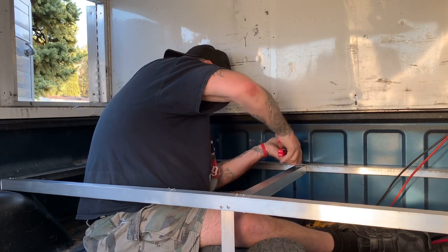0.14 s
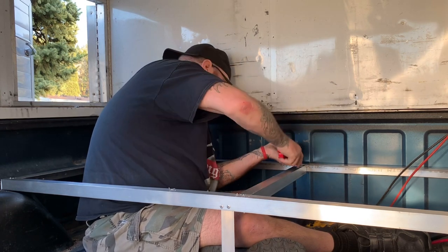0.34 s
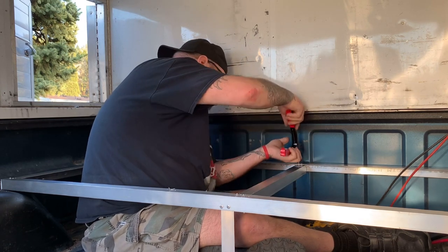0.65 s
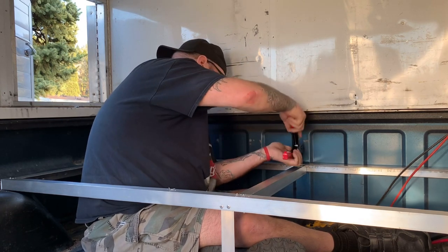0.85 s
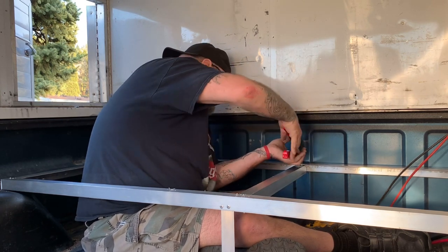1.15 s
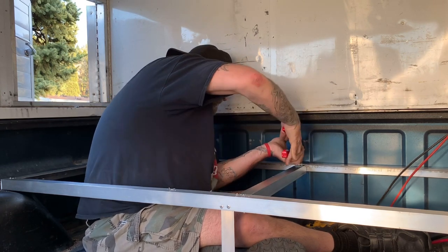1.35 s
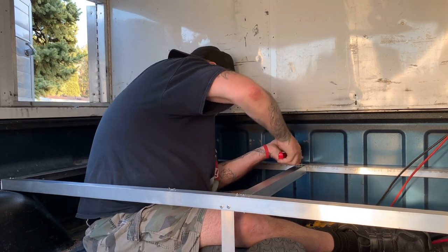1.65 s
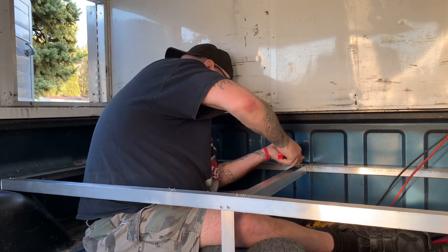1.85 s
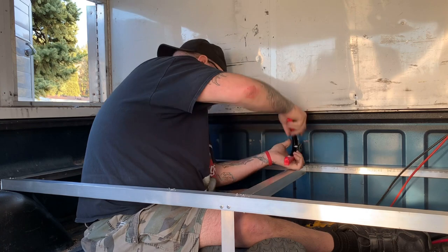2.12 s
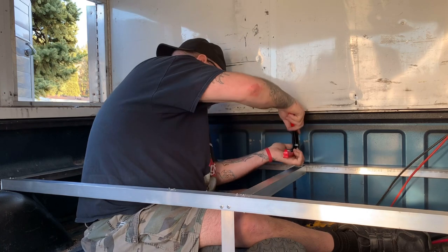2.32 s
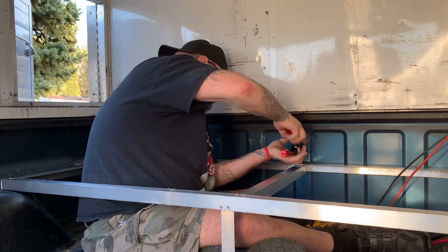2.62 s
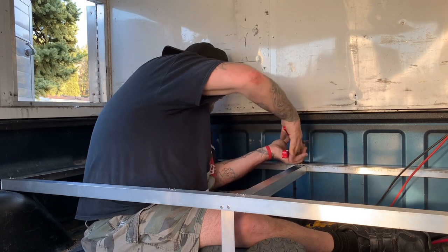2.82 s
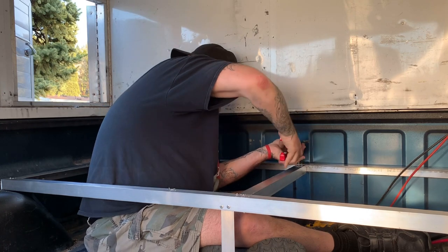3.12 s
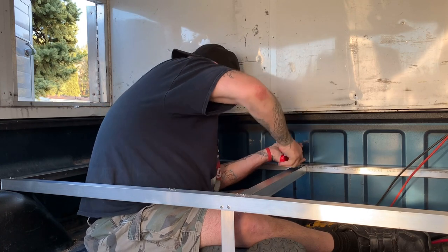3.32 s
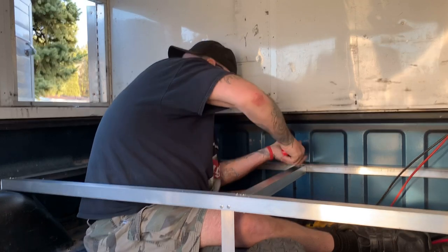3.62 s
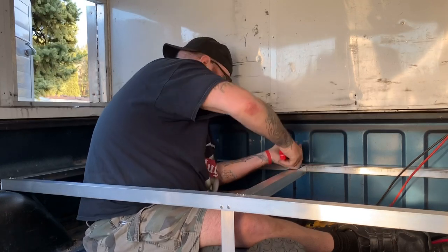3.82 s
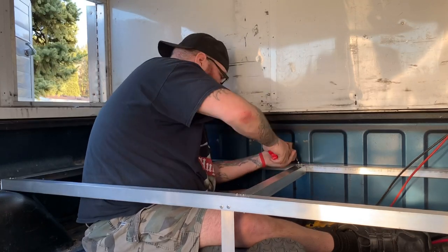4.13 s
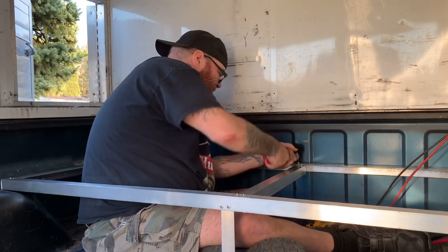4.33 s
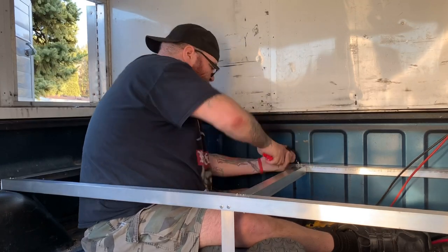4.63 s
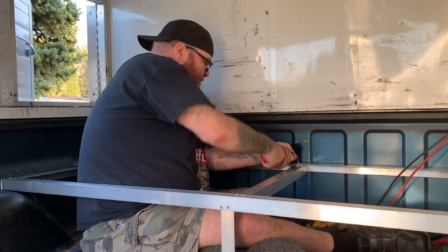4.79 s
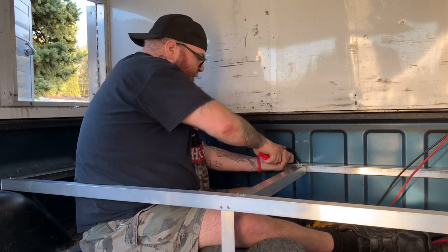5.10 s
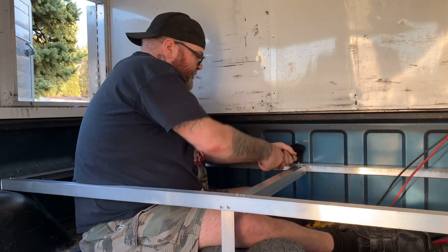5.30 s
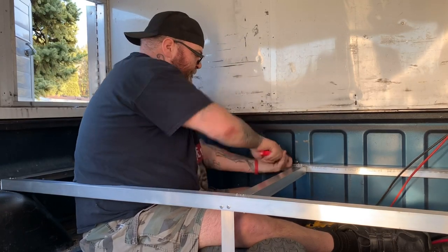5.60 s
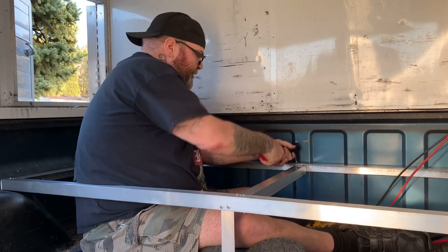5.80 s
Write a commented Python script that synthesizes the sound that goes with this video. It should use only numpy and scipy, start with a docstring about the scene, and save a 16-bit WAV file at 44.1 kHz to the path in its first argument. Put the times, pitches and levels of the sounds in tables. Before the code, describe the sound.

Someone squeezes a hand rivet tool against a hollow metal frame: two moderate knocks early, a loud clattering cluster near two seconds, a tight double snap later, then quieter fiddling and a final bright burst near the end. Underneath are muffled thumps, panel drumming and soft rustling. The space is small, hard and boxy, captured close in stereo, with a faint high ring after hard snaps.

```python
"""Riveting in a sheet-metal cabin

A hand riveter knocks an aluminium tube frame: bursts of tiny impacts excite a crack and damped tube modes,
and panel modes swell after them. Filtered noise gives floor rumble, panel drumming, murmur and the rustle of
hands and cloth; wavering sines give a thin ring after the hardest snaps. Dense random reflections make the
reverberation of the bare cabin, heard through two close microphone ports."""
import sys
import numpy as np
from scipy import signal
from scipy.fft import rfft, irfft, next_fast_len
from scipy.io import wavfile
from scipy.ndimage import uniform_filter1d

SR = 44100
rng = np.random.default_rng(int(sys.argv[2]) if len(sys.argv) > 2 else 0)


def to_wav(sig):
    """Store sig (one row per channel, or 1-D mono) as 16-bit WAV at the path in sys.argv[1].

    Samples outside -1..1 are clipped; the rate is SR.
    """
    pcm = np.clip(np.atleast_2d(sig), -1, 1) * 32767
    pcm = np.round(pcm).astype(np.int16)
    wavfile.write(sys.argv[1], SR, pcm.T)  # frames by channels


N = 262395  # length in samples

# Steady sounds of the shell, rms before sway and weighting:
# [t/s, floor rumble level/dB, panel drumming level/dB, murmur level/dB]
WORK = [(0.0, -47, -40, -50.5), (0.36, -52, -39.5, -53), (0.71, -41.5, -31.5, -41.5),
        (1.04, -41.5, -39, -51.5), (1.37, -45, -38, -51.5), (1.76, -39, -45, -49.5),
        (1.99, -44, -43, -51.5), (2.22, -52.5, -30.5, -42.5), (2.73, -42, -41.5, -51.5),
        (3.2, -42.5, -42.5, -50), (3.56, -60, -38.5, -47.5), (3.84, -56, -39.5, -57), (4.14, -55, -55, -61),
        (4.37, -48.5, -52, -52), (4.54, -47, -45.5, -55.5), (5.55, -53.5, -46.5, -56),
        (5.7, -49.5, -35.5, -43), (5.95, -49.5, -43.5, -56)]
# Spectrum of the floor rumble: [f/Hz, level/dB]
RUMBLE = [(12, -87.5), (27, -26), (40, -7.5), (50, 3), (60, 16), (70, -9), (80, -29), (95, -54.5)]
# Resonances of the drumming panels: [f/Hz, width/Hz, level/dB]
DRUMMING = [(108, 69, -4), (149.7, 14, 2.5), (190, 69, -17.5), (232, 65, -14.5), (354.7, 18, -16.5),
            (430, 56, -18.5), (683, 37, -16.5)]
# Spectrum of the murmur: [f/Hz, level/dB]
MURMUR = [(250, -3), (355, 4.5), (420, -1), (700, -3), (930, -4), (1300, -12), (2500, -27.5), (5000, -65)]
# Spectrum of cloth and fingers: [f/Hz, level/dB]
RUSTLE = [(600, -35.5), (1500, 5.5), (3200, 5.5), (5000, -3), (7500, -11.5), (10500, -14), (13000, -15),
          (16500, -42.5)]
# Rubs of cloth and fingers: [loudest moment t/s, level/dB, length/s]
RUBS = [(0.133, -64, 0.31), (0.49, -46, 0.11), (0.633, -40, .03), (0.687, -45, 0.1), (1.315, -57, 0.12),
        (1.558, -64, 0.37), (1.707, -60, 0.1), (2.02, -52, 0.15), (2.079, -30.5, 0.082), (2.48, -52, .25),
        (2.607, -55.5, 0.11), (3.31, -53, 0.17), (3.448, -41.5, 0.1), (3.813, -79, 0.051),
        (3.972, -72, 0.093), (4.412, -58.5, 0.27), (4.925, -62.5, 0.34), (5.3, -64, 0.18),
        (5.53, -48, 0.047), (5.67, -33.5, 0.14)]
RUSTLE_REST_DB, RUB_DROP_DB = -68, 12.5  # level between rubs; drop half a length from the loudest moment

# Knocks of tool on frame, peak levels before the cabin:
# [t/s, blow level/dB, brightest pitch f/Hz, treble level/dB, panel boom level/dB, boom pitch f/Hz]
KNOCKS = [(0.0934, -47.5, 1546, 17, -41.5, 136), (0.204, -41.5, 1610, -7, -32, 157),
          (0.2488, -49, 2140, 0, -41, 155), (0.3364, -40, 2350, 0, -63, 246),
          (0.425, -38.5, 2020, -10, -62, 147), (0.443, -31, 2330, -4, -39, 180),
          (0.507, -22, 1660, -11, -19, 207), (0.6379, -16.5, 1450, -3, -9, 316),
          (0.7985, -47, 2530, 7, -33.5, 155), (0.8832, -39.5, 2100, -30, -29, 158),
          (0.9053, -35, 2160, -16, -34.5, 171), (0.9857, -39, 2200, -8, -52, 147),
          (1.0935, -55, 1650, -32, -25, 164), (1.2514, -42.5, 2460, 6, -56.5, 154),
          (1.3096, -55, 2470, -7, -59, 145), (1.3875, -49.5, 2900, 2, -45.5, 179),
          (1.65, -45.5, 1530, 6, -40, 126), (1.7302, -52.5, 1550, 0, -49.5, 183),
          (1.955, -40, 1730, -14, -33, 129), (2.0407, -10.5, 2680, 4.5, -23.5, 440),
          (2.0648, -17.5, 6360, -1, -19.5, 360), (2.1479, -10.5, 2000, -0.5, -13.5, 384),
          (2.44, -47, 3270, -27, -31.5, 217), (2.547, -37, 1910, -10, -57, 131),
          (2.796, -41.5, 1570, -18.5, -41, 150), (3.2709, -39.5, 1530, 1, -41.5, 144),
          (3.3758, -7.5, 3730, 2.5, -27.5, 584), (3.3905, -9, 3800, 7, -22.5, 393),
          (3.9392, -56, 3210, 14, -63, 130), (4.0887, -52, 1570, -5, -47, 150.3),
          (4.1727, -53.5, 1750, 0, -65, 191), (4.289, -46.5, 1620, -5.5, -45.5, 129),
          (4.3295, -48.5, 1650, 7, -37, 167), (4.4614, -52, 3340, 19, -48.5, 211),
          (4.564, -44.5, 1780, -13, -37, 145.7), (4.7594, -38.5, 2430, 3.5, -52, 146.5),
          (4.846, -49.5, 1730, -27, -38, 367), (5, -42, 2170, -13, -36, 149),
          (5.022, -36.5, 1780, -13, -33.5, 186), (5.2259, -38, 1670, -16, -62, 160.5),
          (5.25, -38.5, 2140, 0, -39, 146), (5.324, -44, 1660, -4, -32, 129),
          (5.501, -39, 1570, -8, -38.5, 438), (5.5627, -13.5, 3320, 17, -25, 180),
          (5.5868, -6, 2470, 7.5, -23.5, 160), (5.5998, -17, 1920, -28, -13.5, 504),
          (5.681, -9.5, 3840, 8.5, -23.5, 268)]
# Modes of the tube frame: [f/Hz, level/dB, t60/s]
TUBES = [(981, -10, 0.056), (1167, -8, 0.021), (1560, -6.5, .035), (1700, -5, 0.033), (2104, -5.5, 0.025),
         (2164, -8.5, 0.034), (2570, 1, 0.014), (2750, -6, 0.027), (3190, -10, 0.063), (3130, -17, 0.038),
         (3733, 2, 0.0088), (3827, 0.5, 0.013), (4050, -27.5, .03), (4390, -16.5, .025),
         (6306, -14.5, 0.014), (7400, -30, 0.0074), (10600, -13.5, 0.013)]
# Modes of the sheet-metal panels, about which each knock varies: [f/Hz, level/dB, t60/s]
PANELS = [(152.5, -12.5, 0.13), (205, -12, 0.13), (270.4, -8.5, 0.083), (361.3, -5, 0.12),
          (444, -11.5, 0.097), (524.6, -1, 0.065), (644, -9.5, 0.096), (718, -10, 0.099)]
# Spectrum of the crack: [f/Hz, level/dB]
CRACK = [(150, -23.5), (500, -4), (1000, 3.5), (1800, -6.5), (3500, 2.5), (6000, -6), (9000, -7.5),
         (12000, -11.5), (16500, -28)]
RATTLE_S = .0065  # time constant of the impacts of one knock
CRACK_DB, BRIGHT_OCTAVES = 8.5, 0.5  # crack peak over ring peak; 1/e half-width of the hump
BOOM_RISE_S = 0.019  # swell time of the panels

# Decay of the cabin's reflections: [f/Hz, t60/s]
CABIN = [(150, 0.48), (400, 0.19), (1040, 0.23), (2760, 0.16), (7280, 0.12), (14000, 0.1)]
CABIN_DB = 2

# Thin rings after the hardest snaps: [loudest moment t/s, level/dB, rms flicker/dB]
RINGS = [(0.76, -65, 4), (2.28, -59, 4), (3.716, -47, 0.5), (5.86, -58.5, 3.5)]
# Partials of the thin ring: [f/Hz, level/dB]
RING_MODES = [(3182, 2.5), (3215, -16), (4200, -29)]
RING_SWELL_DB_PER_S, RING_FADE_DB_PER_S = 41.5, 102

# Coherence of the ports, alike in bass and treble, unrelated between: [f/Hz, likeness from 0 to 1]
SAME = [(60, 1), (150, 0.98), (300, 0.77), (600, 0.15), (1200, 0.09), (5500, 0.11), (7600, 1),
        (16000, 0.73)]
# Level of the left port over the right: [f/Hz, level/dB]
LEFT = [(60, -1), (250, -2.5), (1000, 1.5), (4000, -0.5), (10000, -0.5)]
# Phase lead of the right port: [f/Hz, phase/turns]
LEAD = [(0, 0), (650, .25), (6300, 1), (15700, 3), (22050, 4.35)]
MIC_LOW_HZ, EDGE_HZ = 28.4, 16600  # low and high limits of the ports


def gain_of(db):
    """Logarithmic level: decibels become an amplitude factor."""
    return 10 ** (np.asarray(db) / 20)


def evened(x):
    """Normalisation to unit rms."""
    return x / np.sqrt(np.mean(x ** 2) + 1e-20)


def read(points, hz):
    """Interpolation of a spectrum table, linear along log frequency."""
    f, value = np.transpose(points)
    return np.interp(np.log(hz + 1), np.log(f + 1), value)


def coloured(x, points):
    """Spectral shaping: each frequency is weighted by a table of f/Hz, level/dB."""
    size = x.shape[-1]
    hz = np.fft.rfftfreq(size, 1 / SR)
    return irfft(rfft(x) * gain_of(read(points, hz)), size)


def smooth_noise(width):
    """Moving average: white noise over width samples becomes a slow random course of unit rms."""
    return evened(uniform_filter1d(rng.standard_normal(N), width))


def modes(table, seconds):
    """Free vibration: each row is one mode, an exponentially damped sine."""
    hz, db, t60 = np.transpose(table)[:, :, None]
    t = np.arange(round(seconds * SR)) / SR
    return gain_of(db - 60 * t / t60) * np.sin(2 * np.pi * hz * t)


def floor_rumble(noise):
    """Amplitude modulation: low noise sways as the floor heaves above its rest level."""
    sway = gain_of(2.5 + 3.7 * smooth_noise(6000))
    return sway * evened(coloured(noise, RUMBLE))


def panel_drumming(noise):
    """Resonance: noise drives the panels through a sum of resonance peaks."""
    hz = np.fft.rfftfreq(N, 1 / SR)
    resonance = sum(gain_of(db) / (1 + ((hz - f) / (width / 2)) ** 2) for f, width, db in DRUMMING)
    return evened(irfft(rfft(noise) * resonance, N))


def rustle(noise, clumps):
    """Friction noise: cloth and fingers release clumped grains, louder during each rub."""
    t = np.arange(N) / SR
    level = gain_of(RUSTLE_REST_DB)
    for s, db, length in RUBS:
        level = level + gain_of(db - RUB_DROP_DB * abs(2 * (t - s) / length) ** 1.4)
    grains = gain_of(1.1 * rng.exponential(1, (2, N)))
    return level * evened(coloured(noise * grains * clumps, RUSTLE))


def work():
    """Random excitation: body weight shakes floor and panels while cloth and fingers rustle."""
    s, *columns = np.transpose(WORK)
    t = np.arange(N) / SR
    rumble_gain, drumming_gain, murmur_gain = (gain_of(np.interp(t, s, c)) for c in columns)
    for_floor, for_panels, for_murmur, for_rustle = rng.standard_normal((4, 2, N))
    clumps = gain_of(1.4 * smooth_noise(900))
    rubbing = rustle(for_rustle, clumps)
    rumble = rumble_gain * floor_rumble(for_floor)
    drumming = drumming_gain * panel_drumming(for_panels)
    murmur = np.sqrt(2) * murmur_gain * evened(coloured(for_murmur * clumps, MURMUR))
    return rumble + drumming + murmur + rubbing


def blow_tone(f, hz, treble_db):
    """Selective excitation: a hump at the blow's pitch, then a treble shelf of its own height."""
    high = 1 / (1 + (7000 / (f + 1)) ** 4)
    hump = 0.59 + np.exp(-(np.log2(f / hz + 1e-9) / BRIGHT_OCTAVES) ** 2)
    return hump * (1 - high) + gain_of(treble_db) * high


def panel_boom(boom_hz):
    """Modal superposition: panel modes near the boom pitch lead, and all swell after the blow."""
    near = .5 + np.exp(-(np.log2(np.transpose(PANELS)[0] / boom_hz) / 0.39) ** 2)
    signs = rng.choice([-1, 1], len(PANELS))
    # each knock varies frequency and decay time, not level
    varied = PANELS * rng.uniform([.98, 1, .8], [1.02, 1, 1.2], (len(PANELS), 3))
    boom = (near * signs) @ modes(varied, .4)
    t = np.arange(len(boom)) / SR
    return boom * (1 - np.exp(-(t / BOOM_RISE_S) ** 2))


def knocks():
    """Impulsive excitation: a burst of tiny impacts sets off a crack, the tube modes and the panels."""
    size = 4096
    tubes, out = modes(TUBES, .2), np.zeros(N + SR)
    tube_hz, bins = np.transpose(TUBES)[0], np.fft.rfftfreq(size, 1 / SR)
    u = np.arange(size) / SR / RATTLE_S
    for s, db, hz, treble_db, boom_db, boom_hz in KNOCKS:
        noise = rng.standard_normal(size)
        strengths = gain_of(3.7 * rng.exponential(1, size))
        impacts = noise * strengths * u * np.exp(-u)
        crack_tone = blow_tone(bins, hz, treble_db) * gain_of(read(CRACK, bins))
        crack = irfft(rfft(impacts) * crack_tone)

        # where the blow lands weights the modes
        share = blow_tone(tube_hz, hz, treble_db) * rng.uniform(0.81, 1.2, len(tube_hz))
        alternating = (-1) ** np.arange(len(share))
        ring = signal.fftconvolve(impacts, (share * alternating) @ tubes)

        boom = panel_boom(boom_hz)
        sound = gain_of(boom_db) * boom / abs(boom).max()
        sound[:len(ring)] += gain_of(db) * ring / abs(ring).max()
        sound[:size] += gain_of(db + CRACK_DB) * crack / abs(crack).max()
        # the burst begins a little before the tabled moment
        at = max(round((s - .55 * RATTLE_S) * SR), 0)
        out[at:at + len(sound)] += sound
    return out[:N]


def reflections():
    """Diffuse reverberation: dense random echoes, each band dying at its own speed, in unit-energy tails."""
    taps = np.zeros((2, SR // 2))
    # one echo of random sign in every 10 samples, placed separately for each port
    at = np.arange(60, SR // 2 - 20, 10) + rng.integers(0, 10, (2, SR // 20 - 8))
    np.put_along_axis(taps, at, rng.choice([-1., 1.], at.shape), 1)
    hz, t, z = signal.stft(taps, SR, nperseg=256)
    decay = gain_of(-60 * t / read(CABIN, hz)[:, None])
    tail = signal.istft(z * decay, SR, nperseg=256)[1]
    return tail / np.linalg.norm(tail, axis=1, keepdims=True)


def cabin(x):
    """Time-varying reverberation: the worker's body shifts, so three tails take turns."""
    out = np.zeros((2, N))
    turn = 2 * np.pi * 3.1 * np.arange(N) / SR
    for k in range(3):
        window = np.sqrt(2 / 3) * np.cos(turn + 2 * np.pi * k / 3)
        out += signal.fftconvolve(x * window, reflections(), axes=1)[:, :N]
    return out


def ring_level():
    """Exponential growth and decay: each flickering ring swells slowly and fades faster."""
    t = np.arange(N) / SR
    flicker = evened(uniform_filter1d(uniform_filter1d(rng.standard_normal(N), 400), 400))
    level = np.zeros(N)
    for s, db, flicker_db in RINGS:
        fall_db = np.logaddexp(RING_SWELL_DB_PER_S * (s - t), RING_FADE_DB_PER_S * (t - s))
        # each starts at the latest knock before its loudest moment
        start = max(k[0] for k in KNOCKS if k[0] < s)
        level += gain_of(db + flicker_db * flicker - fall_db) * (t > start)
    return level


def rings():
    """Phase diffusion: three partials waver slightly as their phases drift at random."""
    out, t = np.zeros((2, N)), np.arange(N) / SR
    level = ring_level()
    for hz, part_db in RING_MODES:
        drift = 0.0013 * np.cumsum(rng.standard_normal(N))  # radians
        broken_db = -.2 * part_db * smooth_noise(700)  # weak partials break up
        partial = np.sin(2 * np.pi * hz * t + drift)
        out += np.sqrt(2) * gain_of(part_db + broken_db) * level * partial
    return out


def scene():
    """Superposition: direct knocks (first at the right port), reverberation, rings and work noise add."""
    blows = knocks()
    direct = np.array([blows, np.roll(blows, -11)])  # right port 11 samples early
    return 0.46 * direct + gain_of(CABIN_DB) * cabin(direct) + rings() + work()


def record(dry):
    """Partial coherence: the right port shares some left sound, early; then low cut, squash, band limit."""
    size = next_fast_len(N + 4096)
    hz = np.fft.rfftfreq(size, 1 / SR)
    left, right = rfft(dry, size)
    same = np.clip(read(SAME, hz), 0, 1)
    lead = np.exp(2j * np.pi * np.interp(hz, *np.transpose(LEAD)))
    shared = same * lead * left
    own = np.sqrt(1 - same ** 2) * right
    tilt = gain_of(read(LEFT, hz) / 2)
    low_cut = 1 / (1 + (MIC_LOW_HZ / (hz + 1)) ** 6)
    spectra = np.array([left * tilt, (shared + own) / tilt]) * low_cut
    ports = irfft(spectra, size)[:, :N]
    squashed = np.tanh(ports) * 1.13
    band_limit = signal.firwin(511, EDGE_HZ, window=("kaiser", 9), fs=SR)
    return signal.oaconvolve(squashed, band_limit[None], "same")


dry = scene()
out = record(dry)
to_wav(out)
```